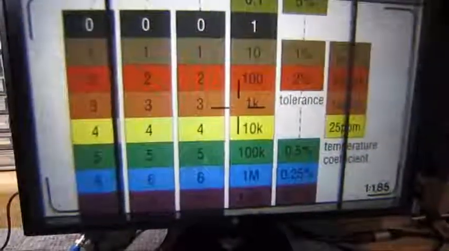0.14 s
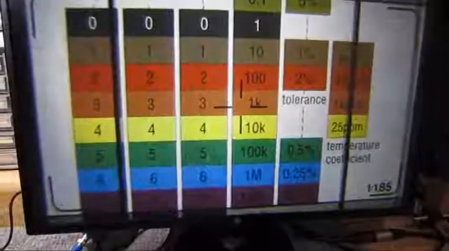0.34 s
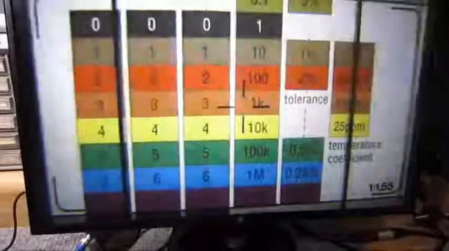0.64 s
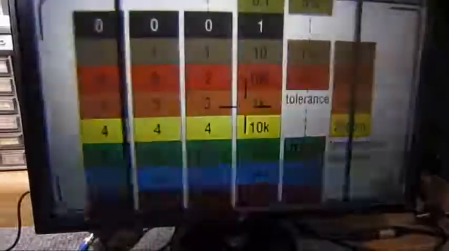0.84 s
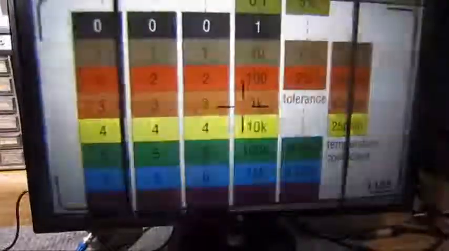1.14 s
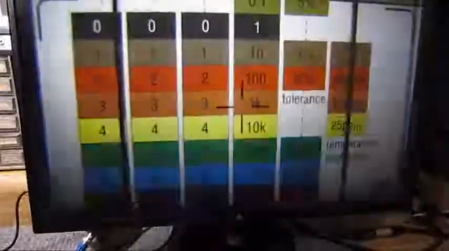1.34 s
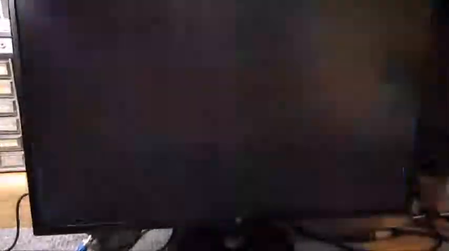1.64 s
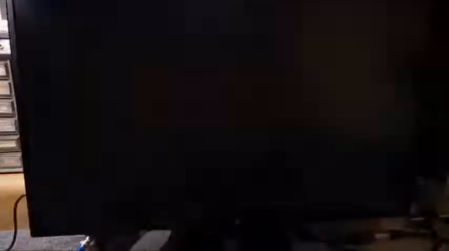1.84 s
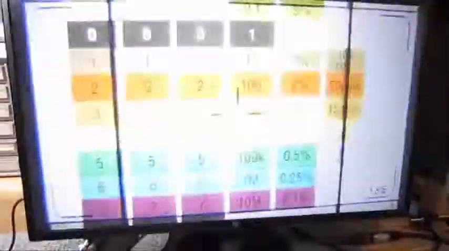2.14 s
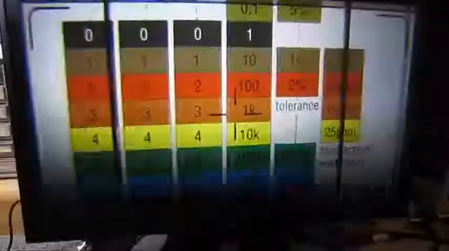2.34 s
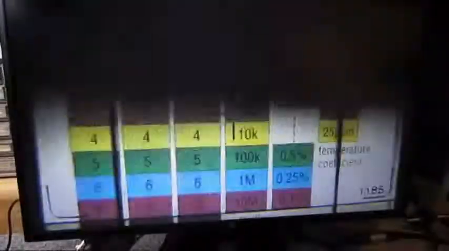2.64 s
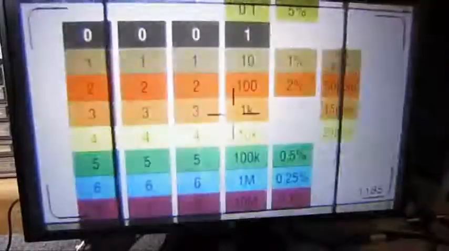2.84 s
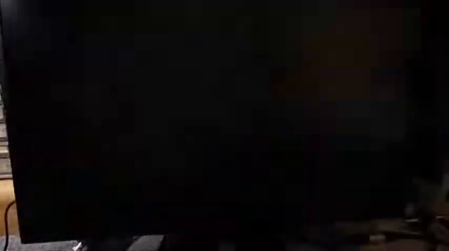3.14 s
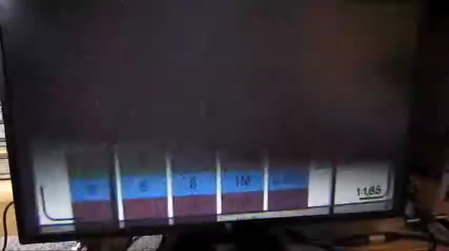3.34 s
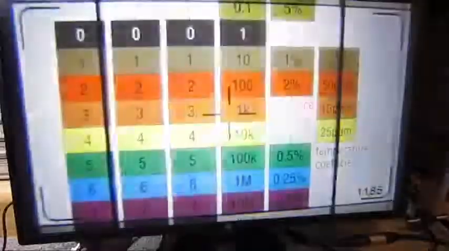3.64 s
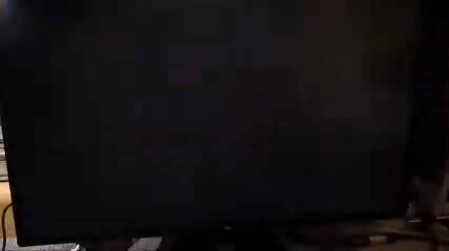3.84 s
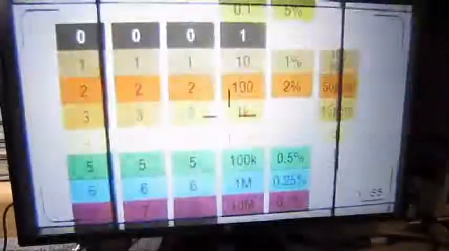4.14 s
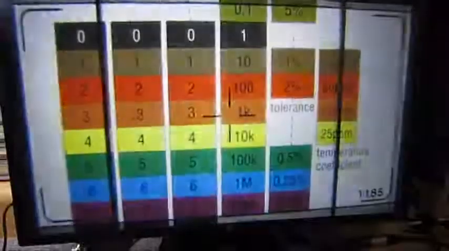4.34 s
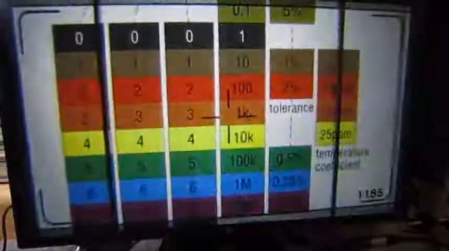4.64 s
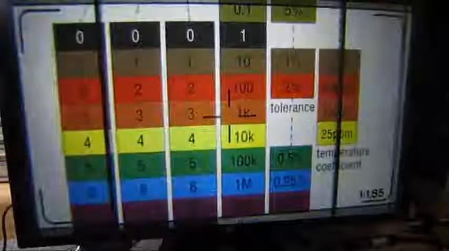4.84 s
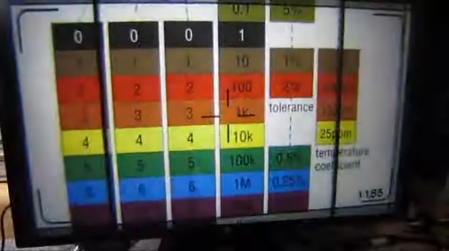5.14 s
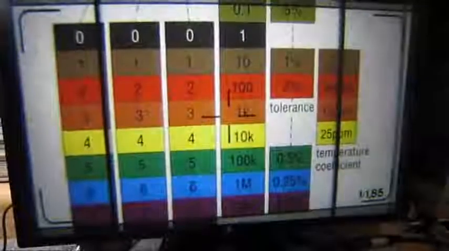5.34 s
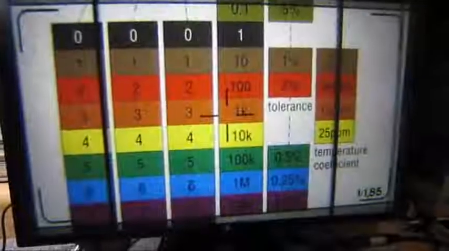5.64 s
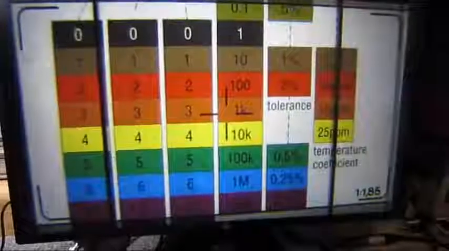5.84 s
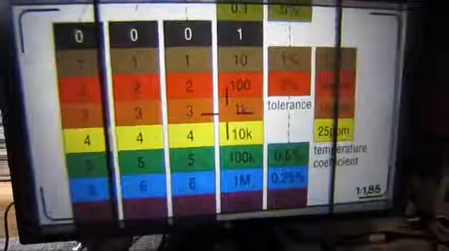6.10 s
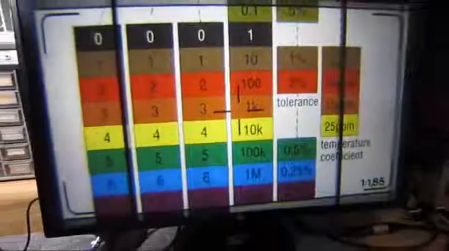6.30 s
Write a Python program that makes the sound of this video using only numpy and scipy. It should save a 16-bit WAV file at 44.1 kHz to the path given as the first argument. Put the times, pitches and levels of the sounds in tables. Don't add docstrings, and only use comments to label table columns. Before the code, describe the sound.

Indoors, near the left side of a stereo microphone, a small gear drive whirs and chatters, clicks off sharply and coasts down, its ticks spreading apart as it weakens to silence. It is then nudged eleven times, giving short metallic knocks with brief gear rattle, a softer bounce-back and a dull thump on the desk. A low room hum with a gentle fan lies underneath and is left alone afterwards.

```python
import sys
import numpy as np
from scipy import signal
from scipy.fft import rfft, irfft, next_fast_len
from scipy.io import wavfile
from scipy.ndimage import uniform_filter1d

SR = 44100
rng = np.random.default_rng(int(sys.argv[2]) if len(sys.argv) > 2 else 0)


def int16_out(signal):
    q = np.round(np.clip(np.atleast_2d(signal).T, -1, 1) * 32767)
    wavfile.write(sys.argv[1], SR, q.astype(np.int16))


def linear_from_db(decibels):
    return 10 ** (np.asarray(decibels, float) / 20)


N = 285270

# f/Hz, level/dB per Hz
AIR_SPECTRUM = [(12, -46), (20, -13.5), (64, -2.5), (86, -11.5), (175, -3), (206, -5), (451, -7), (490, -7),
                (1100, -14), (1450, -14), (2360, -23), (8660, -38.5), (13000, -59)]
AIR_DB = -59.5
# f/Hz, likeness
AIR_LIKENESS = [(60, -0.62), (180, -0.63), (510, -0.76), (1490, -0.57), (4350, -0.25), (12700, 0.36)]
# f/Hz, width/Hz, level/dB
FAN = [(64.3, 29, 12), (209.5, 15, 4), (1430, 34, 2), (1850, 30, 7.5)]

# f/Hz, width/Hz, level/dB while running, level/dB when knocked
HOUSING = [(357.2, 46, -7.5, 0), (445.3, 80, -2, 1), (560.3, 43, 2.5, 1.5), (657, 44, -1, -4),
           (799, 36, 2.5, 1), (891, 57, -2, -6)]
FRAME = [(974, 22, -12, -4), (1034, 71, -14.5, -6.5), (1134, 69, -8.5, -0.5), (1188, 48, -8, -8.5),
         (1275.4, 32, -3.5, 7), (1343, 51, -4.5, 1), (1476, 79, -5.5, -5)]
PLATE = [(1631, 59, -6.5, -5.5), (1707.5, 32.4, 1.5, -1.5), (1757, 41, 0.5, -2), (1816, 39, -4.5, -3),
         (1903, 28.5, -6, -5.5), (2042, 54, -14, -10.5)]
SMALL_PARTS = [(2203, 135, -0.5, -2), (2496, 93, 0, -0.5), (2701, 71, 1, -0.5), (3047, 153, -3.5, -8.5),
               (3486, 185, -8, -13.5), (4100, 280, -7.5, -15.5), (5230, 1100, -12.5, -16),
               (7040, 2200, -17, -23.5), (8900, 2040, -21, -25), (10600, 310, -19, -22.5),
               (11580, 260, -13.5, -18.5), (12930, 250, -11.5, -17)]

START_FPS, FRICTION_FPS_PER_S, DRAG_PER_S, START_FRAME = 25.382, 11.0716, .038189, .8774
RATTLE_DB, RATTLE_LOSS = -31, 1.856
HOUSING_DB, HOUSING_LOSS = -12.5, -0.51
HISS_DB, HISS_LOSS = -13, 0.094
RUMBLE_DB, RUMBLE_LOSS = -52.5, 2.8
CLAW_DB, CLAW_LOSS, CLAW_STALL = -43, 0.36, 0.069

# place/frame, tick level/dB, body knock level/dB re tick
CYCLE = [
    (0, 0.6, 9),
    (.28, -11.5, 7.5),
    (.53, -8.5, 15),
]
KNOCK_SPREAD_DB = 2.5
# t/s, peak level/dB, knock level/dB re peak
SLAPS = [
    (0.019, -42, 16.5),
    (0.271, -52, 17),
    (0.339, -43, 17.5),
    (1.845, -67, 21),
    (1.951, -69, 14),
]
# f/Hz, level/dB
TICK = [(1500, -15), (2800, 9), (3500, 3.5), (4500, -1.5), (7000, -9), (9500, -12.5), (13000, -20)]

# t/s, peak level/dB
SWITCH = [
    (0.175, -31),
    (6.36, -64),
]
# f/Hz, level/dB, 60 dB decay/s
SWITCH_RING = [(3090, -1.5, 0.023), (4080, -13, 0.018), (5700, -3, .02), (6600, -7, .015),
               (7900, -0.5, 0.012), (8380, -3, 0.013), (8700, -12, 0.017), (12600, -1.5, 0.014)]

# t/s, peak level/dB, gears keep turning/s, desk thump level/dB, housing level/dB re peak
JOGS = [(2.1855, -33, 0.014, -50, -1.5), (2.4191, -38.5, 0.013, -55, 0), (2.574, -30, 0.019, -50, -2.5),
        (2.8417, -34, 0.013, -52.5, -2), (3.0615, -33.5, .007, -53.5, -2.5),
        (3.2351, -40.5, 0.026, -51.5, 1), (3.5142, -34, 0.024, -55, -0.5), (3.7342, -35, 0.016, -53, -1.5),
        (3.907, -28.5, 0.0093, -46.5, -5.5), (4.0807, -34.5, 0.018, -47, -1),
        (4.2346, -39, 0.0075, -48, 1.5)]
# t/s, peak level/dB, gears keep turning/s, plate level/dB re peak
REBOUNDS = [(2.2087, -44.5, 0.013, -15), (2.4455, -44.5, 0.02, -3), (2.5885, -46, 0.025, -3.5),
            (2.868, -43.5, 0.018, -3.5), (3.0892, -42.5, 0.014, -7), (3.264, -41.5, 0.02, -2),
            (3.5416, -46.5, .012, -6.5), (3.7688, -42.5, 0.0039, -6), (3.9289, -41, 0.008, -21),
            (4.1082, -40.5, 0.0061, -14), (4.2522, -40, 0.0054, -5.5), (6.4222, -58.5, .002, -3)]
JOG_PLATE_DB, JOG_HISS_DB = -6, -14
REBOUND_HOUSING_DB, REBOUND_HISS_DB = 1.7, -8.5
USUAL_DB, SOFT_PLATE, SOFT_HISS = -37, 0.17, 0.036
BLOW_LEAD_S = 0.012
DESK_HZ, DESK_LEAD_S = 138, 0.003

# f/Hz, likeness
NEAR_LIKENESS = [(60, 0.2), (150, 0.94), (360, 0.99), (870, 0.99), (2130, 1), (5210, 0.58), (12700, 0.052)]
# f/Hz, level/dB
NEAR_LEFT = [(60, 2.8), (180, 7.3), (510, 7.4), (1490, 10.2), (4350, 9.7), (12700, 18.8)]
# f/Hz, level/dB
MIC = [(20, -13.5), (45, -2), (60, 0.5), (9000, 0), (10500, -6.5), (13000, -6)]


def evened(x):
    return x / np.sqrt(np.mean(x ** 2) + 1e-20)


def peak_one(x):
    return x / np.sqrt(2 * uniform_filter1d(x ** 2, 180).max() + 1e-20)


def read(points, hz):
    f, value = np.transpose(points)
    return np.interp(np.log(hz + 1), np.log(f + 1), value)


def add(mix, s, sound):
    part = mix[round(s * SR):][:len(sound)]
    part += sound[:len(part)]


def air():
    frames, hz = N // 256 + 5, np.fft.rfftfreq(1024, 1 / SR)
    a, b, c, d, patches = rng.standard_normal((frames, 513, 5)).T
    patches = evened(uniform_filter1d(uniform_filter1d(patches, 8, 0), 14, 1))
    swells = evened(uniform_filter1d(rng.standard_normal((frames, len(FAN))), 50, 0)).T
    fan_db = 0
    for (f, width, db), swell in zip(FAN, swells):
        band = np.exp(-((hz[:, None] - f) / width) ** 2)
        fan_db = fan_db + db * (1 + 0.31 * swell) * band
    same = np.clip(read(AIR_LIKENESS, hz), -1, 1)[:, None]
    left = a + 1j * b
    right = same * left + np.sqrt(1 - same ** 2) * (c + 1j * d)
    z = np.array([left, right]) * linear_from_db(read(AIR_SPECTRUM, hz)[:, None] + 1.35 * patches + fan_db)
    floor = signal.istft(z, nperseg=1024, noverlap=768)[1][:, :N]
    return linear_from_db(AIR_DB) * floor / np.sqrt(np.mean(floor.mean(0) ** 2))


def shaft():
    t, offset = np.arange(N) / SR, FRICTION_FPS_PER_S / DRAG_PER_S
    fps = np.maximum((START_FPS + offset) * np.exp(-DRAG_PER_S * t) - offset, 1e-3)
    return START_FRAME + np.cumsum(fps) / SR, 20 * np.log10(START_FPS / fps)


def ring(modes, knocked):
    hz, width, run_db, knock_db = np.transpose(modes)[:, :, None]
    t = np.arange(6000) / SR
    signs = (-1) ** np.arange(len(modes))[:, None]
    level = signs * linear_from_db(knock_db if knocked else run_db) * width
    h = (level * np.exp(-np.pi * width * t) * np.sin(2 * np.pi * hz * t)).sum(0)
    return h / np.linalg.norm(h)


def teeth(size, per_s, spread_db):
    hit = rng.random(size) < per_s / SR
    sign = rng.choice([-1., 1.], size)
    strength = linear_from_db(spread_db * np.minimum(rng.exponential(1, size), 4))
    return evened(hit * sign * strength)


def gear_train():
    frames, lost_db = shaft()
    phase = frames % 1
    load_db = 1.5 - 1.2 * phase + 0.39 * np.cos(4 * np.pi * frames - .8)
    slow = 1 - linear_from_db(-lost_db)
    dense = teeth(N, per_s=2500, spread_db=-1.5)
    sparse = teeth(N, per_s=600, spread_db=2.0)
    drive = np.sqrt(1 - slow) * dense + np.sqrt(slow) * sparse
    drive *= linear_from_db(RATTLE_DB - RATTLE_LOSS * lost_db + load_db)
    drive[:300] *= linear_from_db(5.5)
    housing_gain = linear_from_db(HOUSING_DB - HOUSING_LOSS * lost_db)
    hiss_gain = linear_from_db(HISS_DB - HISS_LOSS * lost_db - 2.3 * (phase - .5))
    out = linear_from_db(-5.5) * signal.oaconvolve(drive, ring(FRAME, False))
    out += linear_from_db(-6.0) * signal.oaconvolve(drive, ring(PLATE, False))
    out += signal.oaconvolve(drive * housing_gain, ring(HOUSING, False))
    out += signal.oaconvolve(drive * hiss_gain, ring(SMALL_PARTS, False))
    rumble_band = signal.butter(3, [58, 160], "band", fs=SR, output="sos")
    rumble = evened(signal.sosfilt(rumble_band, rng.standard_normal(N)))
    return out[:N] + rumble * linear_from_db(RUMBLE_DB - RUMBLE_LOSS * lost_db)


def claw_contacts():
    frames, lost_db = shaft()
    rows = []
    for place, db, knock_db in CYCLE:
        for frame, chance in zip(np.arange(1, 29), rng.standard_normal(28)):
            if frame + place < frames[-1]:
                at = np.searchsorted(frames, frame + place)
                lost = lost_db[at]
                level_db = CLAW_DB - CLAW_LOSS * lost - CLAW_STALL * lost ** 2
                rows.append((at / SR, level_db + db, knock_db + KNOCK_SPREAD_DB * chance + 0.24 * lost))
    return rows


def claw():
    out, t = np.zeros(N), np.arange(1024) / SR
    colour = linear_from_db(read(TICK, np.fft.rfftfreq(1024, 1 / SR)))
    envelope = np.minimum(t / 0.0003, 1) * np.exp(-t / 0.0086)
    arm = np.sin(2 * np.pi * 3470 * t) * np.exp(-t / 0.0072)
    arm += .5 * np.sin(2 * np.pi * 4150 * t) * np.exp(-t / 0.0042)
    plate = peak_one(ring(PLATE, False) + 0.41 * ring(FRAME, False) + 0.18 * ring(HOUSING, False))
    for s, db, knock_db in SLAPS + claw_contacts():
        tick = irfft(rfft(rng.standard_normal(1024)) * colour) * envelope
        add(out, s, linear_from_db(db) * (peak_one(tick) + 0.72 * arm))
        add(out, s, linear_from_db(db + knock_db) * plate)
    return out


def switch():
    out, t = np.zeros(N), np.arange(4000) / SR
    modes = sum(linear_from_db(db - 60 * t / t60) * np.sin(2 * np.pi * hz * t) for hz, db, t60 in SWITCH_RING)
    envelope = np.minimum(t / 0.0036, 1) * np.exp(-np.maximum(t - .006, 0) / 0.011)
    scrape = rng.standard_normal(4000) * envelope
    crack = peak_one(np.diff(scrape, prepend=0))
    snap = peak_one(signal.oaconvolve(scrape, modes)[:4000]) + 0.85 * crack
    for s, db in SWITCH:
        add(out, s - .004, linear_from_db(db) * peak_one(snap))
    return out


def body_blows(blows):
    out, t = np.zeros(N), np.arange(6000) / SR - BLOW_LEAD_S
    groups = [ring(g, True) for g in (FRAME, HOUSING, PLATE, SMALL_PARTS)]
    knock = np.exp(-(t / 0.0001) ** 2)
    for s, db, turning, housing_db, plate_db, hiss_db in blows:
        motion = np.exp(np.minimum(t, 0) / 0.0037 - np.maximum(t - turning, 0) / 0.019)
        drive = teeth(6000, per_s=1800, spread_db=2.0) * motion + 4.9 * knock
        for rel_db, group in zip((0, housing_db, plate_db, hiss_db), groups):
            add(out, s - BLOW_LEAD_S, linear_from_db(db + rel_db) * peak_one(signal.oaconvolve(drive, group)))
    return out


def jogs():
    blows = []
    for s, db, turning, _, housing_db in JOGS:
        softness = USUAL_DB - db
        plate_db = JOG_PLATE_DB + SOFT_PLATE * softness
        hiss_db = JOG_HISS_DB + SOFT_HISS * softness
        blows.append((s, db, turning, housing_db, plate_db, hiss_db))
    return body_blows(blows)


def desk():
    out, t = np.zeros(N), np.arange(6000) / SR
    thump = peak_one((t / .015) ** 2 * np.exp(-t / 0.0095) * np.sin(2 * np.pi * DESK_HZ * t))
    for s, _, _, desk_db, _ in JOGS:
        add(out, s - DESK_LEAD_S, linear_from_db(desk_db) * thump)
    return out


def rebounds():
    return body_blows([(s, db, turning, REBOUND_HOUSING_DB, plate_db, REBOUND_HISS_DB)
                       for s, db, turning, plate_db in REBOUNDS])


def tail(t60, start):
    taps = np.zeros(SR // 2)
    at = np.arange(start, len(taps) - 20, 20)
    spots = at + rng.integers(0, 20, len(at))
    taps[spots] = rng.choice([-1., 1.], len(at)) * linear_from_db(-60 * at / SR / t60)
    return taps / np.linalg.norm(taps)


def ports(x):
    size = next_fast_len(N + SR)
    hz, direct = np.fft.rfftfreq(size, 1 / SR), rfft(x, size)
    same = np.clip(read(NEAR_LIKENESS, hz), -1, 1)
    left = linear_from_db(read(NEAR_LEFT, hz) / 2)
    right = same + np.sqrt(1 - same ** 2) * rfft(tail(0.02, start=20), size)
    near = np.array([left, right / left]) * linear_from_db(-1.24)
    room = linear_from_db(-9.5) * np.array([rfft(tail(t60, start=300), size) for t60 in (0.3, 0.13)])
    return irfft(direct * (near + room), size)[:, :N]


def scene():
    camera = gear_train() + claw() + switch() + jogs() + desk() + rebounds()
    return air() + ports(camera)


def top_cut(x):
    return signal.sosfilt(signal.butter(12, 13250, fs=SR, output="sos"), x)


def record(dry):
    size = next_fast_len(N)
    response = linear_from_db(read(MIC, np.fft.rfftfreq(size, 1 / SR)))
    heard = irfft(rfft(dry, size) * response, size)[:, :N]
    return top_cut(heard)


dry = scene()
out = record(dry)
int16_out(out)
```